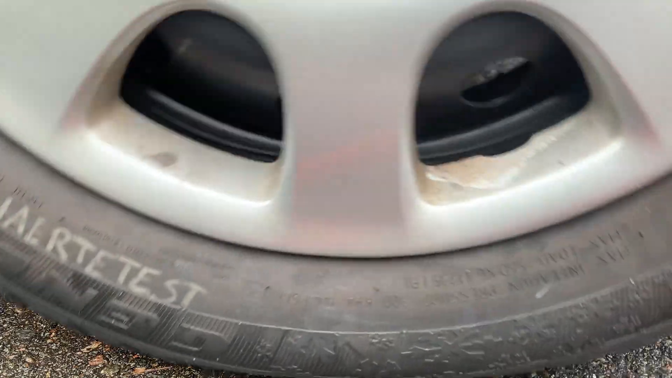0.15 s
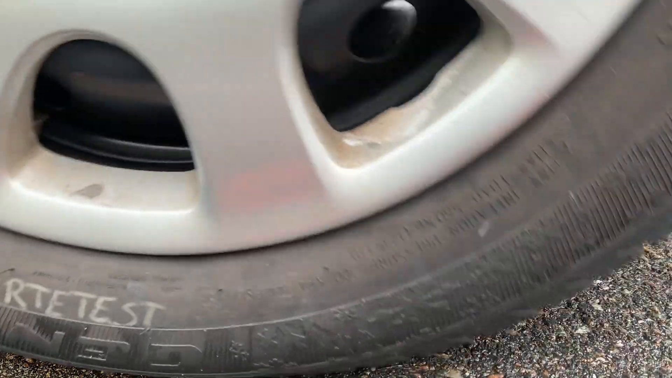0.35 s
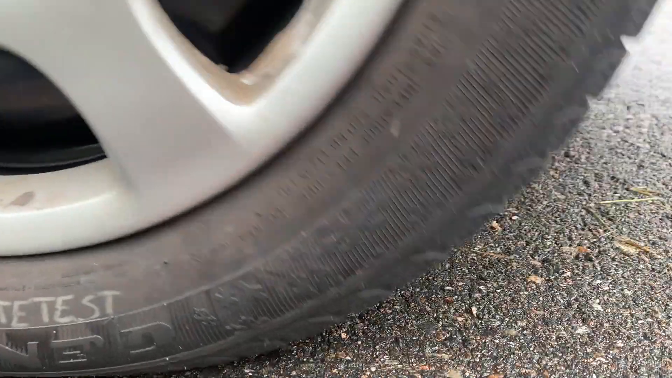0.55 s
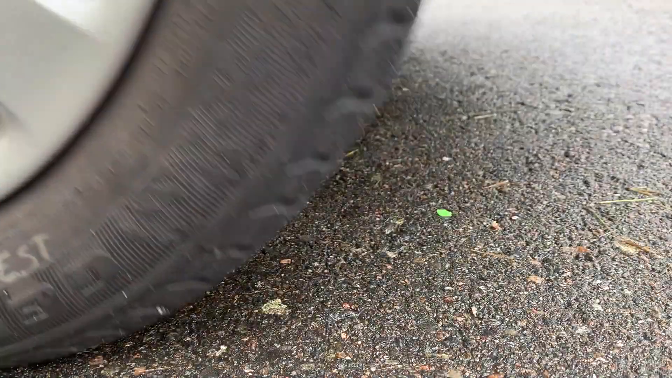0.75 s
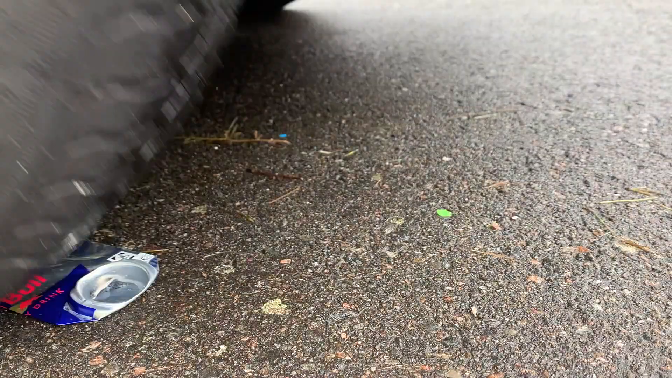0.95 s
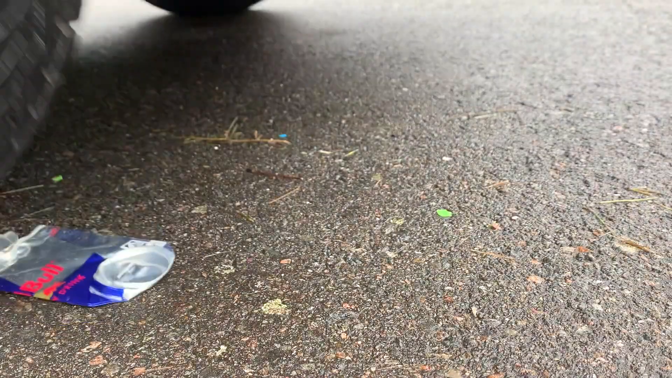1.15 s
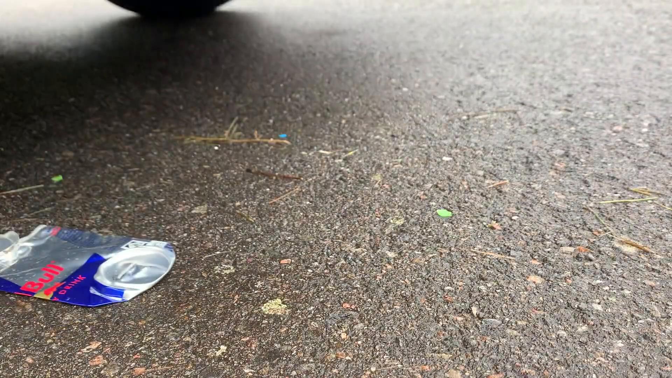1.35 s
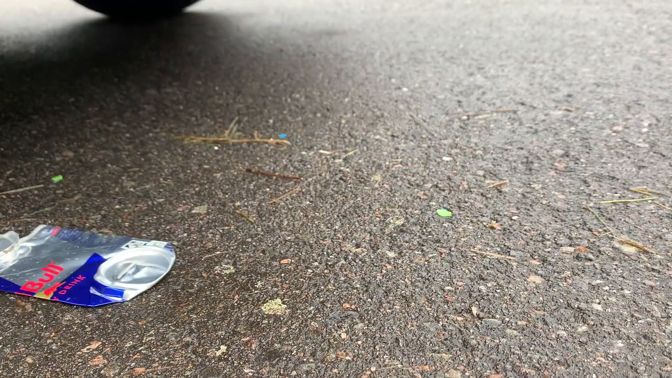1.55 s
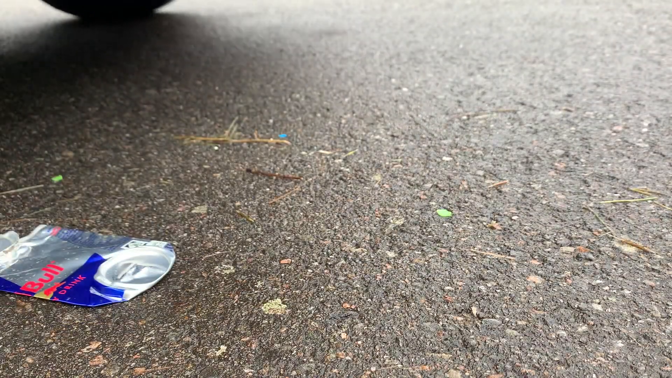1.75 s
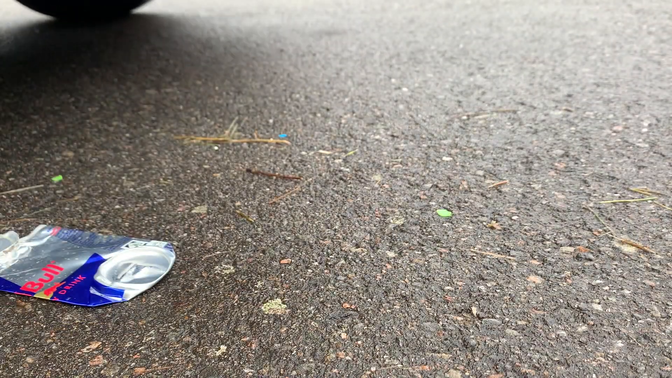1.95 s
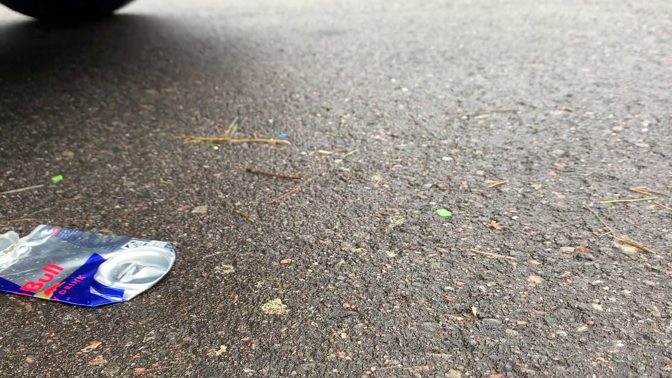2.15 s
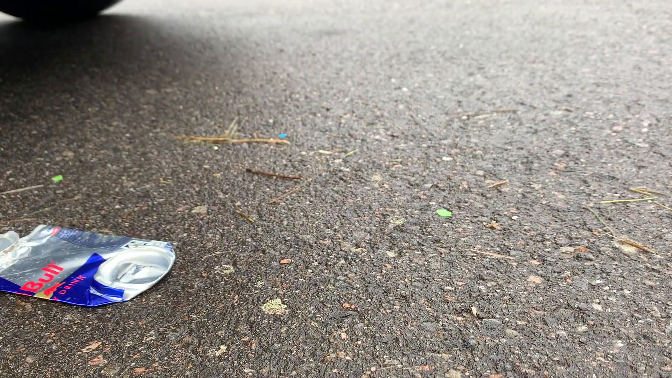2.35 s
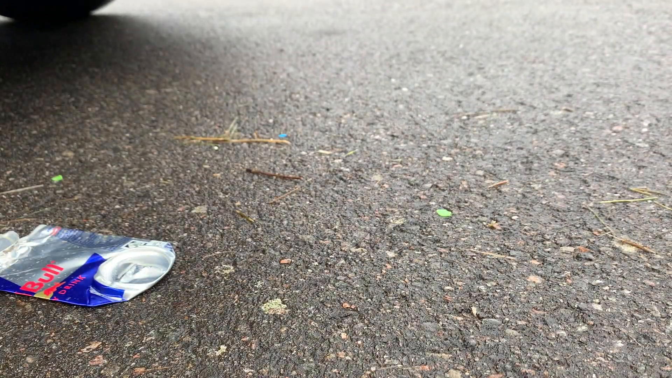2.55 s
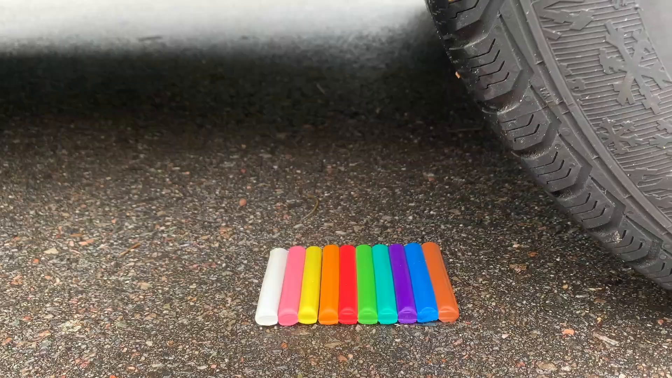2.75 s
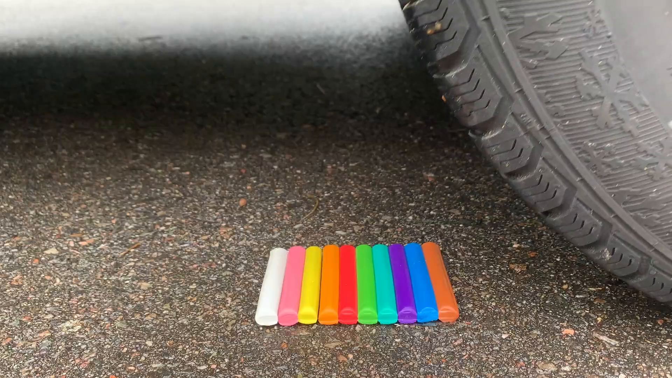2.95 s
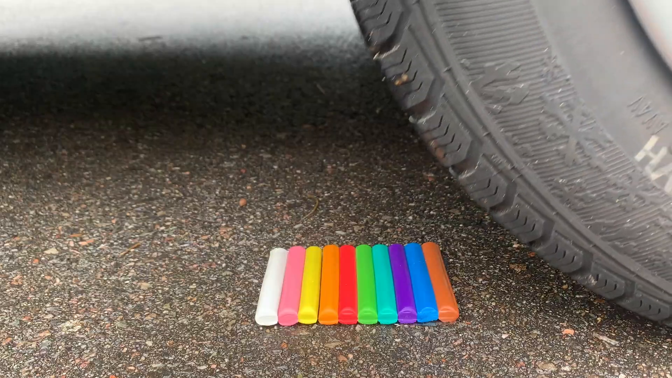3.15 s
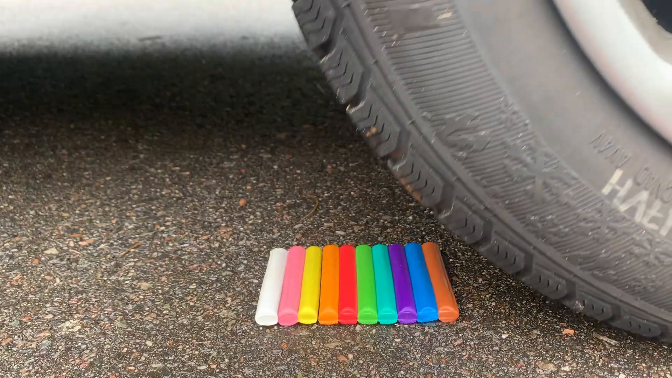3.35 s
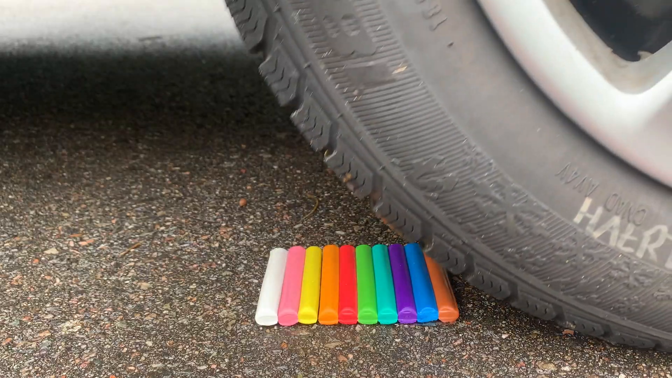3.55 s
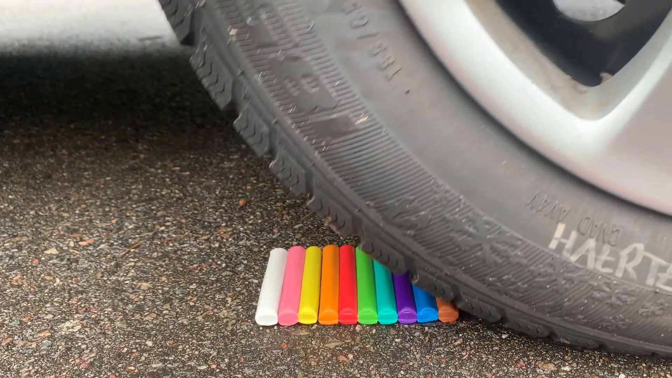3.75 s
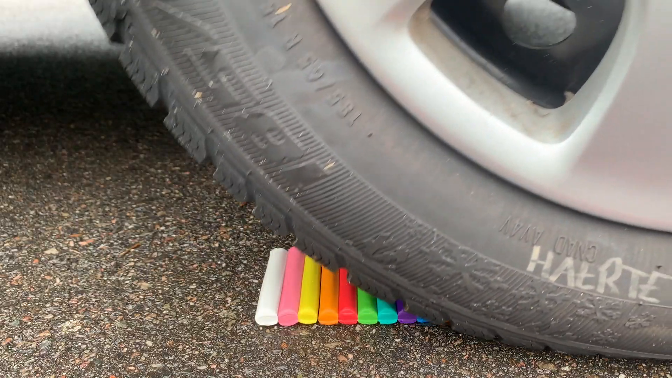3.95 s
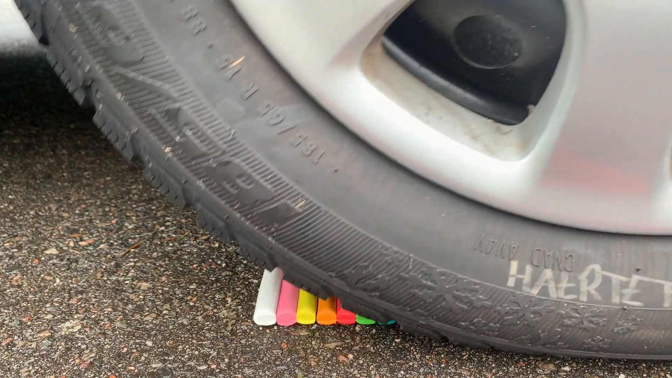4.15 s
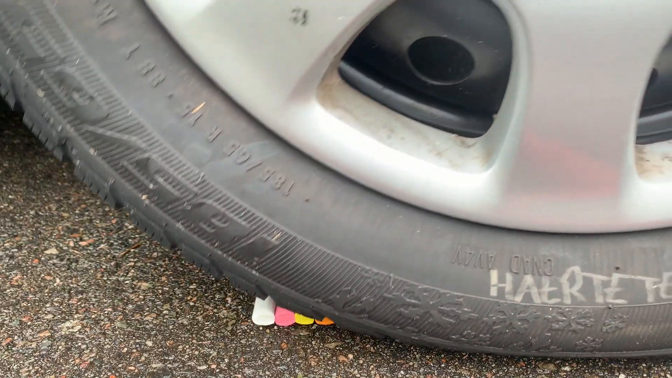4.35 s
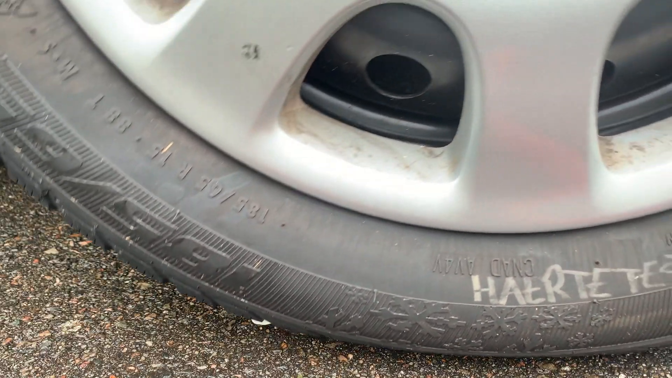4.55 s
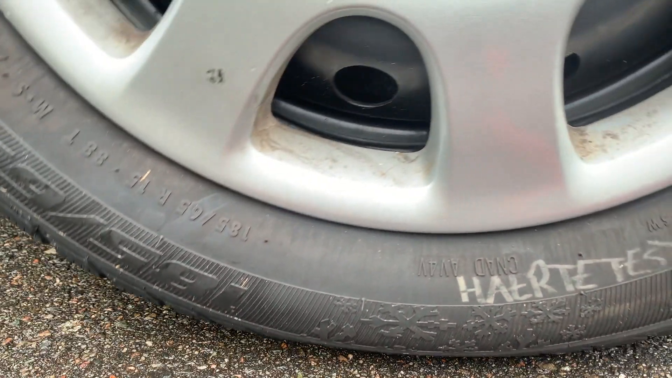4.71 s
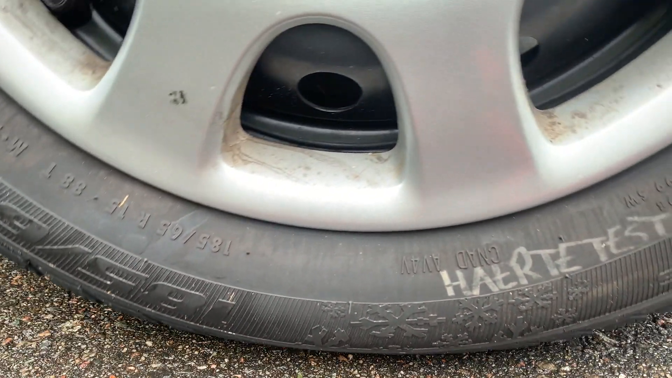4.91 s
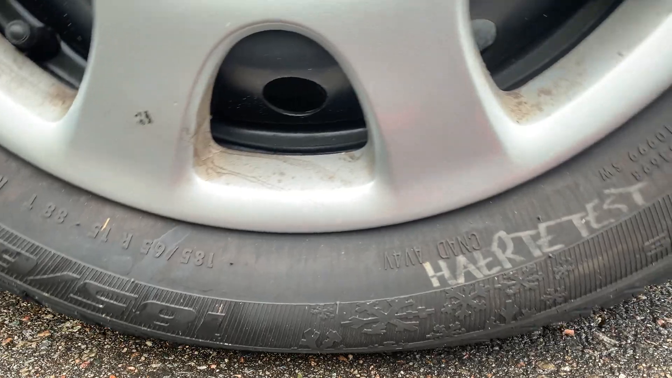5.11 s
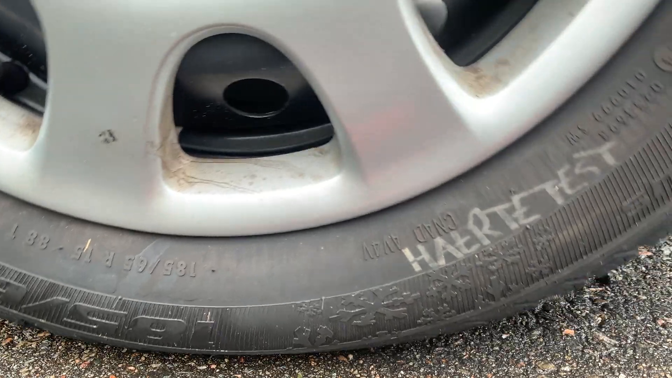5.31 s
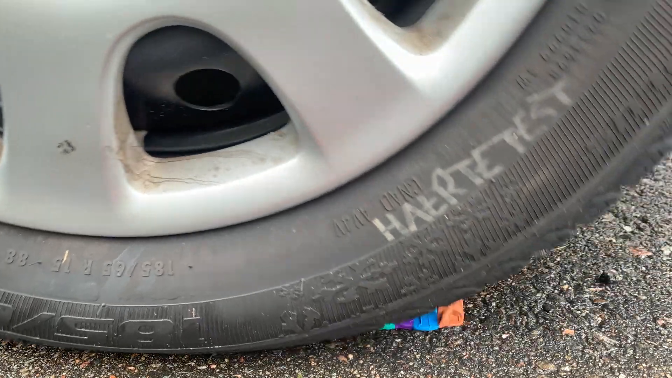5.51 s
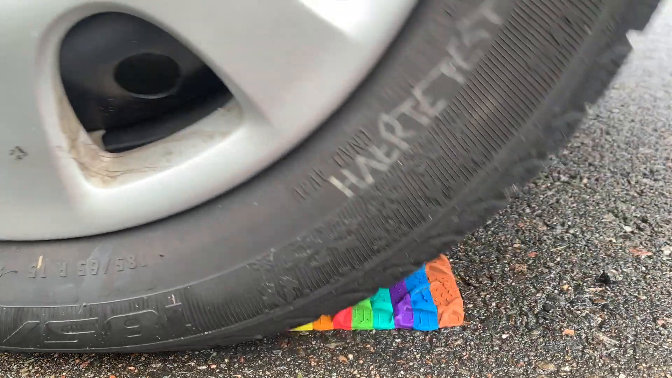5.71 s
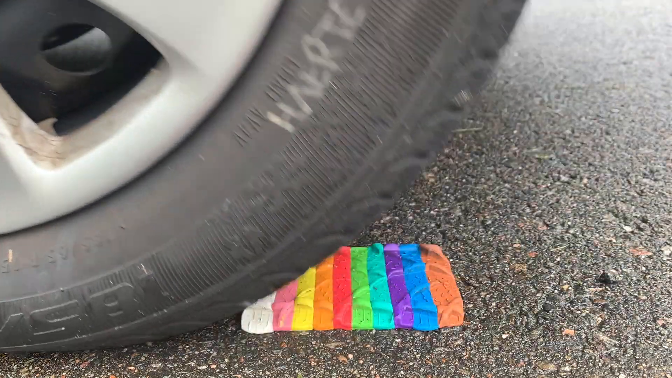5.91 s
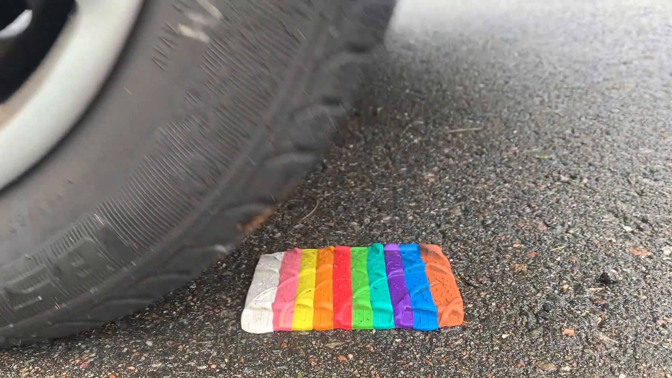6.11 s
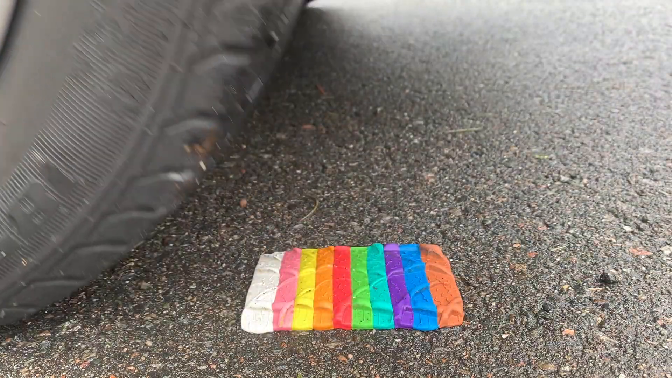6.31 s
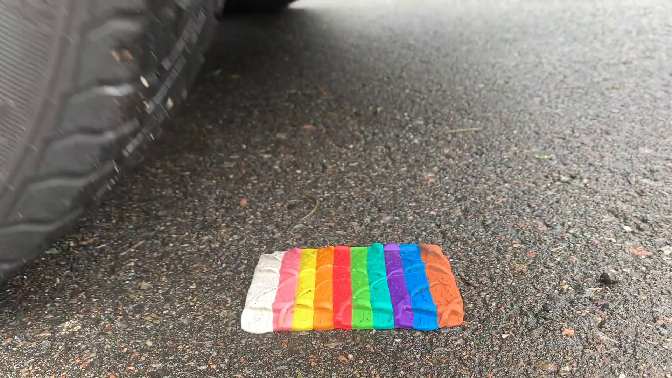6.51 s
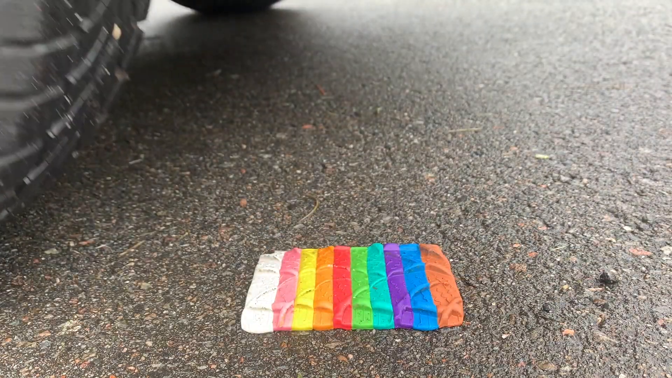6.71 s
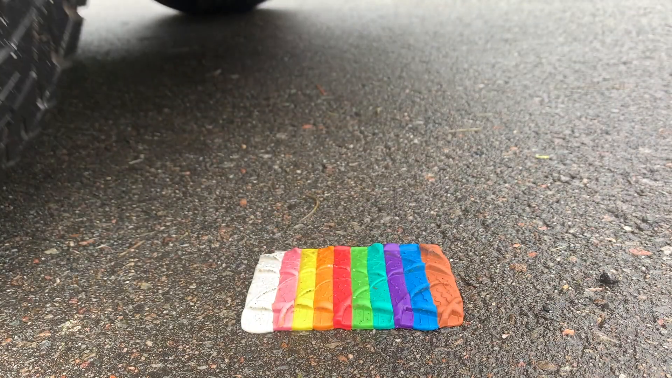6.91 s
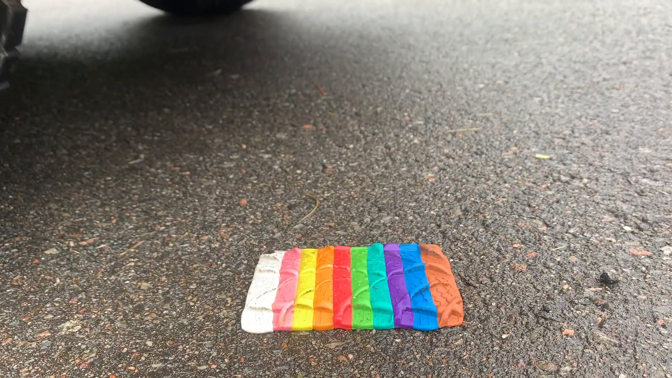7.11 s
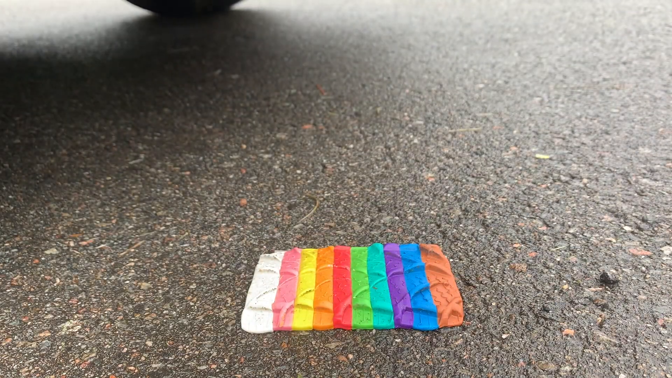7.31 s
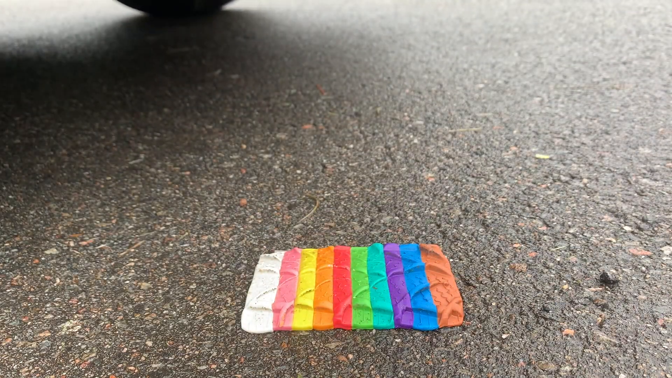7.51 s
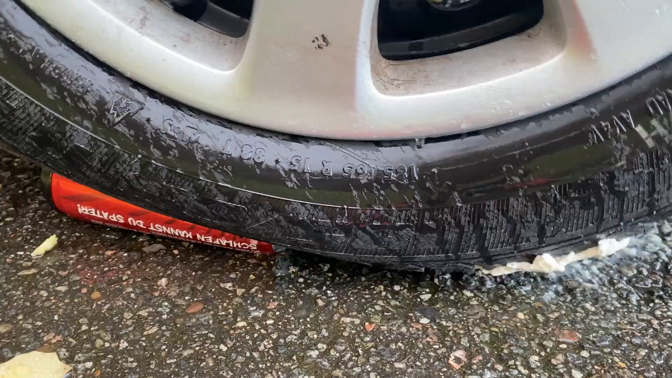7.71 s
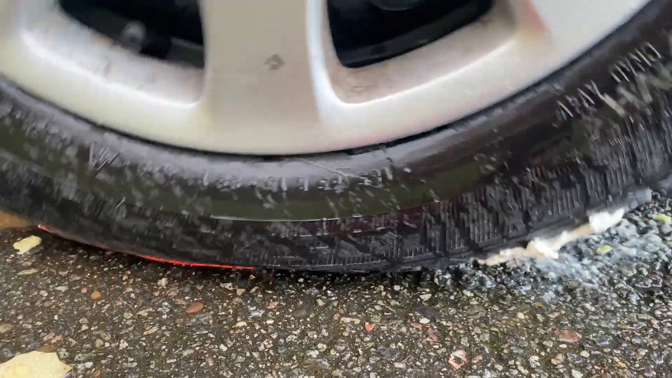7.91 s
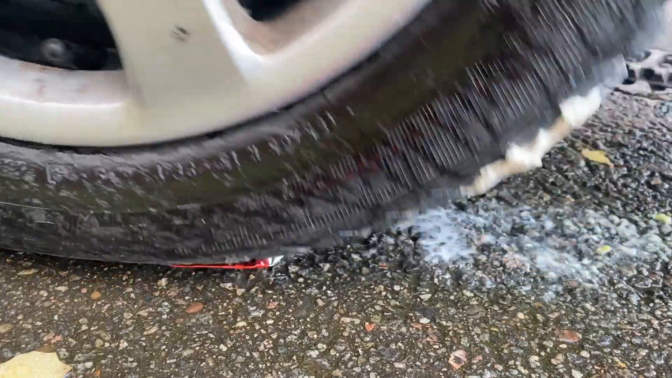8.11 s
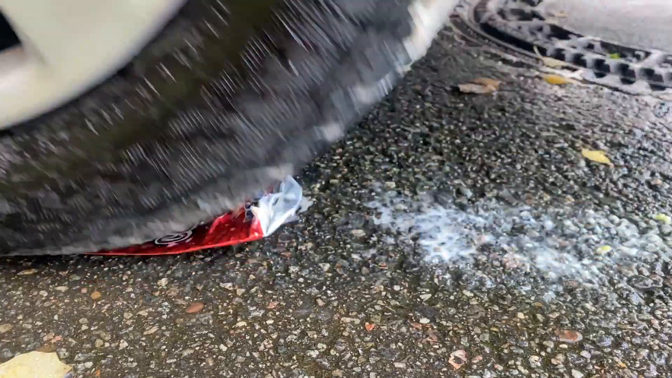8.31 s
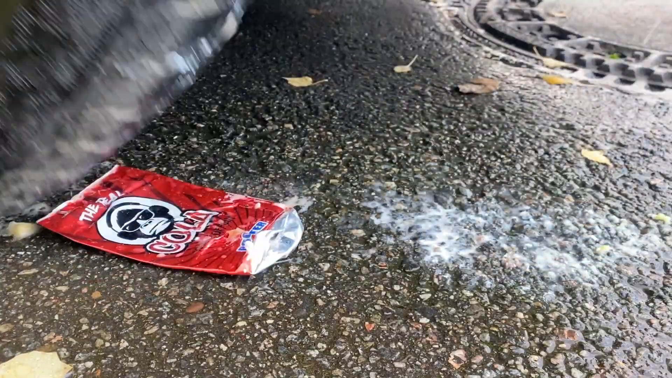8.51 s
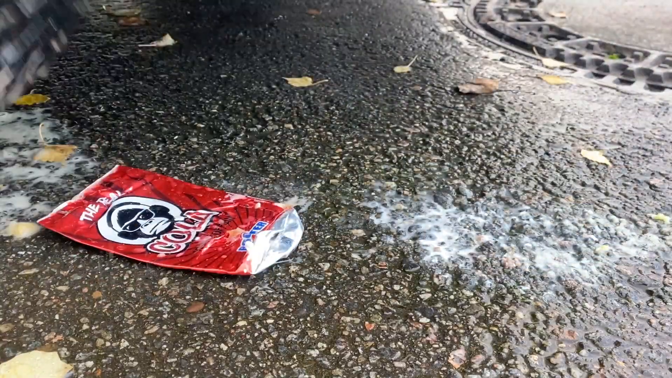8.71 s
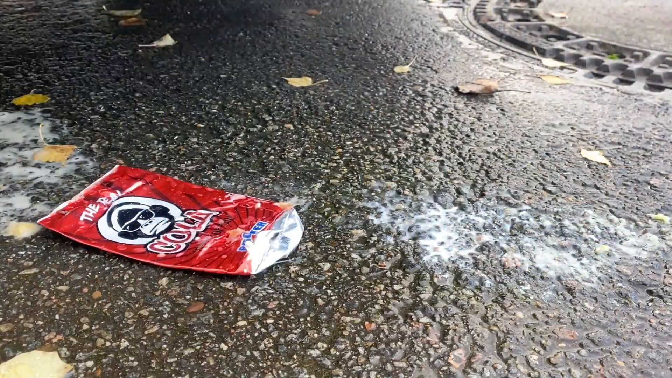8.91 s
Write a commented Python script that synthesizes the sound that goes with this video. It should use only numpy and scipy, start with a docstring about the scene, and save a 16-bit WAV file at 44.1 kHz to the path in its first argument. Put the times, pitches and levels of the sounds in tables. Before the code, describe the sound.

A slow car tyre crunches an aluminium can, rolls over soft clay, then bursts a full can with a bang over engine rumble.

```python
"""Cans and clay crushed under a slow car tyre on asphalt: three short passes, heard from the ground.
Pass 1: an aluminium can buckles; its folds ring, the sheet cracks, its side caves in with thumps.
Pass 2: soft clay sticks are rolled flat, with grit ticks and a fine creak.
Pass 3 cuts in with a click: a full can squeals gas, bursts and fizzes; the wet shell crackles.
Behind: the engine near idle (firings ring pipes and block), fan, belt and tyre hiss, a faint whine."""
import sys
import numpy as np
from scipy import signal
from scipy.fft import rfft, irfft, next_fast_len
from scipy.io import wavfile
from scipy.ndimage import uniform_filter1d

SR = 44100
rng = np.random.default_rng(int(sys.argv[2]) if len(sys.argv) > 2 else 0)


def master(y):
    """Save y as 16-bit WAV."""
    cut = np.clip(np.atleast_2d(y).T, -1, 1)
    pcm = np.round(cut * 32767)  # scale
    wavfile.write(sys.argv[1], SR, pcm.astype(np.int16))


N = 395136
T = np.arange(N) / SR
WET_S, BURST_S = 7.615, 7.779  # start of pass 3; seam failure

# fan, belts, tyre; per pass: t/s, level/dB
HISS_LEVEL = [
    [(0.0, -47), (0.6, -48.5), (1.6, -52.5), (2.68, -55.5)],
    [(2.69, -50), (4.0, -50.5), (7.61, -54.5)],
    [(7.62, -52), (8.15, -57.5), (8.5, -56), (8.96, -60)],
]
# hiss spectra: f/Hz, level/dB
HISS_DRY = [(70, -30.5), (120, -6.5), (200, -5), (231, -13.5), (540, -18), (721, -22), (1130, -27),
            (1490, -32.5), (3600, -41), (4550, -50.5), (5260, -57), (6190, -51), (7150, -64), (7750, -65.5),
            (8080, -43), (15000, -81.5)]
HISS_WET = [(60, -36.5), (120, -26.5), (200, -14), (258, -18.5), (314, -35), (530, -16), (1050, -26),
            (4720, -38), (8570, -42), (9720, -39), (12300, -59), (15000, -61)]
# whine swells: start/s, end/s, level/dB
WHINE_SPANS = [(1.114, 1.427, -70.5), (1.753, 2.562, -72), (4.078, 4.68, -80.5), (6.687, 7.08, -78)]

# engine speed; per pass: t/s, firing rate/Hz
FIRING_RATE = [
    [(0.0, 26.5), (0.19, 31.2), (0.4, 33.7), (0.68, 34.4), (0.83, 31.0), (1.58, 29.8), (1.92, 28.5),
     (2.68, 27.8)],
    [(2.69, 23.3), (3.11, 19.6), (3.27, 21.6), (3.52, 25.1), (3.8, 25.75), (4.13, 23.2), (4.28, 23.0),
     (4.72, 24.65), (5.01, 24.7), (5.87, 24.0), (6.32, 26.8), (6.72, 26.2), (6.93, 26.7), (7.61, 26.8)],
    [(7.62, 35), (7.9, 36.7), (8.17, 33.2), (8.28, 34.1), (8.38, 37), (8.5, 38.8), (8.88, 32), (8.96, 31.7)],
]
# firing strength per cylinder: level/dB
CYLINDER_DB = [2.83, 2.1, 3.96, 3.24]
# per pass: t/s, exhaust/dB, low pipe re exhaust/dB, tailpipe directivity/dB
EXHAUST_LEVEL = [
    [(0.0, -23.5, 0, 2.5), (0.19, -37, 6, -16.5), (0.4, -31, 6, -1.5), (0.66, -27, -6.5, -2),
     (0.89, -30.5, 3, -1.5), (1.5, -33, 6, -0.5), (2.68, -40, 4, 0)],
    [(2.69, -33.5, 2.5, -5), (3.05, -39.5, 8, -18), (3.45, -26, -4.5, -6.5), (4.1, -29.5, -2, -20.5),
     (5.0, -29, -3, -14.5), (5.88, -29, 0, -3.5), (6.31, -25.5, -4.5, 1), (7.61, -28.5, -3.5, 4)],
    [(7.62, -37.5, -2.5, 0), (7.77, -38, 2, -8.5), (7.9, -68.5, 8, -8.5), (8.19, -45.5, 6.5, 1),
     (8.36, -35, -3.5, -5), (8.58, -38.5, -4.5, -3.5), (8.96, -46.5, -1.5, 1.5)],
]
# row per pass: throb/dB, upper pipe/dB, block/dB, gas in upper pipe/1, gas in low pipe/1, puff/dB
ENGINE_MIX = [(-31, -8, 10, 1, 0.56, -39.5), (-41, -8, 5.5, 0.38, 0.41, -49), (-49, -5.5, -7, 0.7, 1, -55)]
# exhaust resonances: f/Hz, width/Hz, level/dB
BOOM_MODES = [(132.6, 16.7, 0), (164.2, 13.4, 0)]
LOW_PIPE_MODES = [(58.15, 8.5, -2.5), (79.4, 14.6, 2), (95.7, 21.5, -2.5)]
UPPER_PIPE_MODES = [(263.2, 27, 14.3), (322.6, 14, 5), (378.6, 10.8, 4.1)]
# upper mode re lower: t/s, level/dB
BOOM_TILT = [(0, -1.5), (.75, -2.5), (1.0, 3), (1.6, 1.5), (2.68, -9.5), (2.69, 3.5), (3.6, -5.5),
             (4.1, 3.5), (5.9, 1.5), (6.2, -4), (8.96, -4.5)]
BLOCK_TILT = [(0, 3.5), (1.8, 5.5), (2.3, -6.5), (2.68, -8.5), (2.69, 5), (4.2, 8.5), (5.0, 0.5), (6.2, 1),
              (6.8, -7.5), (8.96, -6.5)]
# upper pipe rung on every second firing: t/s, level/dB
ALTERNATE_RING_LEVEL = [(4.6, -73), (5.2, -47), (5.8, -44), (6.3, -56), (6.6, -81.5)]
# lower and upper block mode: width/Hz, level/dB
BLOCK_MODES = [(30.6, 1.5), (29.5, 0.5)]
# block mode glide; per pass: t/s, lower f/Hz, upper f/Hz
BLOCK_GLIDE = [
    [(0, 556, 601), (1.2, 539, 617), (2.68, 538, 601)],
    [(2.69, 467, 554), (3.3, 435, 565), (3.8, 463, 601), (4.5, 529, 620), (5.0, 547, 607), (6.2, 525, 622),
     (7.61, 540, 647)],
    [(7.62, 527, 620), (8.96, 499, 618)],
]
# valve gear and covers: f/Hz, width/Hz, level/dB
CLATTER_MODES = [(824, 90, -6.5), (1132.5, 34, -9), (1286, 37, -13.5), (1610, 210, -11.5), (1786, 39, -9.5),
                 (2115, 30, -14), (2393, 61, -15.5), (3540, 260, -30)]
# tappet: t/s, level/dB
TAPPET_KNOCKS = [(2.7522, -41), (2.94, -51), (3.134, -42.5), (3.319, -52), (3.489, -44.5), (3.649, -46.5),
                 (3.8056, -40.5), (3.9686, -44), (4.14, -47), (4.323, -44.5), (4.484, -42), (4.6527, -48),
                 (4.9774, -42)]

# dry grit: t/s, level/dB, f/Hz, treble/dB
GRIT_TICKS = [(1.4392, -35.5, 2350, -50), (3.0595, -31, 2580, -37.5), (3.9572, -45, 2040, -41.5),
              (4.0454, -52, 2010, -41.5), (4.1621, -38, 2200, -53), (4.325, -42, 3500, -44),
              (4.372, -55, 3000, -52), (4.5469, -33.5, 2630, -40), (4.6176, -38, 2350, -47),
              (4.7011, -56, 2140, -40.5), (4.9652, -40.5, 2560, -36), (5.0493, -40.5, 2056, -65),
              (5.1153, -43, 2816, -45), (5.5697, -58, 2010, -46), (5.6161, -39, 2472, -54),
              (7.3076, -34.5, 2130, -72)]
# row 1 click at the hard cut into pass 3, later rows wet shell: t/s, level/dB, f/Hz, treble/dB
WET_PASS_CLICKS = [(7.615, -29.5, 1304, -39), (7.7082, -36.5, 3130, -28), (7.8744, -39.5, 2500, -41),
                   (7.8975, -39.5, 1640, -40), (7.9436, -38.5, 4000, -33.5), (8.01, -25.5, 2320, -27.5),
                   (8.083, -26.5, 4570, -26.5), (8.0914, -31, 1910, -57), (8.1004, -29.5, 1229, -43),
                   (8.116, -22.5, 1010, -49), (8.1433, -34, 1144, -46), (8.1784, -29, 2100, -41),
                   (8.2275, -32.5, 3500, -26.5), (8.2452, -28, 1880, -57), (8.2586, -30, 3700, -36),
                   (8.3005, -29, 3120, -37), (8.3175, -37, 4028, -35), (8.3455, -39, 4800, -34.5),
                   (8.4004, -27, 3630, -26.5), (8.5088, -37.5, 4120, -36), (8.521, -32, 4470, -45),
                   (8.7229, -39.5, 4030, -64)]
# gas jet at the seam: f/Hz, level/dB
SQUEAL_PARTIALS = [(1195, 3), (1900, -14), (2400, -21.5), (3580, -19.5), (5470, -32)]
# pressure swing: delay/s, f/Hz (negative: suction first), t60/s, level/dB
BURST_MODES = [(0.001198, 843, 0.0065, -1.5), (.003, 230, 0.012, -10), (.0048, -115, .022, -8.5),
               (0.0088, 26, .06, -15)]
# tyre kneading the can: t/s, hold/s, level/dB
KNEAD_BOUTS = [(0, 0.0019, -31.5), (0.043, 0.061, -46), (0.187, 0.034, -37.5), (0.26, 0.051, -35),
               (0.335, 0.13, -33.5), (0.491, 0.036, -40), (0.553, 0.083, -50), (0.713, 0.065, -42.5),
               (0.807, 0.033, -53), (0.901, 0.035, -50)]
# can side caving in: t/s, level/dB, f/Hz
CAVE_INS = [(0.063, -1, 251), (0.074, -8.5, 237), (0.246, -22, 181), (0.287, -15.5, 235),
            (0.338, -11.5, 205.6), (0.346, -10.5, 386), (0.359, -11.5, 104.6), (0.367, -5, 246),
            (0.926, -23.5, 399)]
# can wall: t/s, level/dB, fold f/Hz, crack/dB, t60/s
WALL_BUCKLES = [(0.004, -12.5, 967, -42, 0.16), (0.022, -16, 966, -46, 0.062),
                (0.062, -3.5, 1207, -23.5, 0.059), (0.072, -2.5, 870, -20, 0.02),
                (0.104, -14, 1024, -37.5, 0.041), (0.171, -31, 1080, -25.5, 0.025),
                (0.188, -42, 1140, -26.5, 0.025), (0.197, -27.5, 1100, -19, 0.032),
                (0.21, -11, 1080, -19, 0.022), (0.246, -19.5, 1220, -33, 0.02),
                (0.264, -8.5, 1350, -17.5, 0.027), (0.285, -9, 1250, -28.5, 0.077),
                (0.299, -4.5, 1305, -21.5, 0.029), (0.325, -24.5, 1420, -32.5, 0.06),
                (0.336, -5.5, 1170, -14.5, 0.024), (0.346, -4, 1230, -22.5, 0.029),
                (0.3555, -0.5, 1160, -33, 0.018), (0.368, -9, 1190, -19.5, 0.038),
                (0.381, -8.5, 1290, -40, 0.067), (0.404, -5, 1350, -22.5, 0.015),
                (0.407, -15, 2385, -65, 0.085), (0.427, -9.5, 2350, -62, 0.084),
                (0.425, -7, 1230, -21.5, 0.034), (0.44, -16.5, 1230, -20, 0.067),
                (0.457, -17, 1156, -38, 0.028), (0.496, -5.5, 1797, -60, 0.12),
                (0.493, -8.5, 1260, -17.5, 0.028), (0.517, -16, 1280, -19, 0.073),
                (0.527, -7, 1724, -26, 0.071), (0.549, -19.5, 1850, -33.5, 0.05),
                (0.56, -12, 1790, -28.5, 0.0066), (0.59, -25.5, 1340, -36, 0.032),
                (0.623, -17, 1120, -34, 0.017), (0.7109, -33, 3060, -43.5, 0.02),
                (0.727, -18.5, 1190, -43, 0.032), (0.747, -31.5, 1030, -30.5, 0.066),
                (0.769, -8.5, 1675, -34, 0.022), (0.791, -27, 1290, -45, 0.045),
                (0.815, -21, 930, -21.5, 0.022), (0.831, -14.5, 1370, -44, 0.027),
                (0.831, -15, 1800, -60, 0.086), (0.926, -12.5, 1305, -19, 0.025),
                (0.931, -15.5, 1115, -28, 0.038), (1.063, -12, 1677, -23, 0.042),
                (1.11, -18.5, 1650, -31.5, 0.045), (1.152, -30.5, 1650, -46, 0.04)]
# modes rung by cracks (thin sheet; the 8400 Hz row is the microphone): f/Hz, t60/s, level/dB
RUNG_MODES = [(1260, 0.03, -5), (1820, 0.03, -7), (2330, 0.018, -4), (2900, 0.01, -6), (3945, 0.005, -3),
              (4500, 0.0025, 1), (6050, 0.001, 7), (8400, 0.006, -5), (9800, 0.0017, -0.5)]
# microphone ring near 8 kHz with a dip just below, colouring the cracks: f/Hz, level/dB
MIC_RING_EQ = [(6300, 0.5), (7400, -5.5), (8050, 2), (9500, -0.5), (12500, -2.5)]

# left re right: f/Hz, level/dB, phase lead/rad
STEREO_DRY = [(40, 1, -.4), (150, 0, -.45), (500, 1, .1), (1200, 0, 1.2), (2000, -2, 3.2), (4000, -1, 6),
              (6000, -1, 12.3), (8200, -12, 18.4), (10000, -5, 19.5), (13000, 0, 19)]
STEREO_WET = [(40, 1, .1), (250, 0, .2), (600, 3, 1), (1500, 5, .6), (2500, 4, 2.8), (4000, 6, 6),
              (6000, 3, 8), (8200, 0, 9.6), (10000, -1, 12.6)]
# microphone treble response: f/Hz, level/dB
MIC_EQ = [(9000, 0), (11000, 2.5), (12000, -4), (13500, -3.5), (15500, -22)]


def undb(db):
    """dB to amplitude."""
    return 10 ** (np.asarray(db) / 20)


def unit(x):
    """Scale to rms 1."""
    return x / np.sqrt(np.mean(x ** 2))


def curves(*tables):
    """Join (t/s, value, ..) tables; interpolate each value column per sample."""
    t_s, *columns = np.transpose(np.concatenate(tables))
    return [np.interp(T, t_s, column) for column in columns]


def add(out, t_s, x):
    """Mix x in at t_s."""
    i = int(t_s * SR)
    out[:, i:i + x.shape[-1]] += x[..., :N - i]


def noise(count, correlation):
    """Stereo white noise, partly common to both sides."""
    common, own = rng.standard_normal(count), rng.standard_normal((2, count))
    return np.sqrt(correlation) * common + np.sqrt(1 - correlation) * own


def walk(rate_hz):
    """Slewed random steps, spread near 1."""
    hold = int(SR / rate_hz)
    return 1.304 * uniform_filter1d(np.repeat(rng.standard_normal(N // hold + 1), hold), hold)[:N]


def pops(rate_hz, spread_db, cap, correlation):
    """Random stereo impulses; exponential dB spread, limited to cap * spread_db."""
    hits = rng.random(N) < rate_hz / SR
    return hits * undb(spread_db * np.minimum(rng.exponential(size=N), cap)) * noise(N, correlation)


def equalise(x, points):
    """Zero-phase filter through (f/Hz, level/dB) points."""
    hz, db = np.transpose(points)
    size = next_fast_len(N + 4096)
    bins_hz = np.fft.rfftfreq(size, 1 / SR) + 1
    gain = undb(np.interp(np.log(bins_hz), np.log(hz), db))
    return irfft(rfft(x, size) * gain, size)[..., :N]


def ring(x, hz, t60_s):
    """One decaying mode driven by x."""
    pole = np.exp(2j * np.pi * hz / SR - np.log(1000) / (t60_s * SR))
    return signal.lfilter([1], [1, -pole], x).imag


def resonate(x, modes):
    """Sum of (f/Hz, width/Hz, level/dB) resonances, rms 1; a wider second stage steepens the skirts."""
    out = 0
    for hz, width_hz, db in modes:
        narrow = signal.iirpeak(hz, hz / width_hz, SR)
        wide = signal.iirpeak(hz, hz / (3.5 * width_hz), SR)
        out = out + undb(db) * unit(signal.lfilter(*wide, signal.lfilter(*narrow, x)))
    return unit(out)


def glide(x, hz, width_hz):
    """Moving resonance: shift down, smooth twice, shift back; rms 1."""
    carrier = np.exp(2j * np.pi * np.cumsum(hz) / SR)
    narrow, wide = np.exp(-np.pi * width_hz / SR), np.exp(-3 * np.pi * width_hz / SR)
    baseband = signal.lfilter([1], np.convolve([1, -narrow], [1, -wide]), x / carrier)
    return unit((baseband * carrier).real)


def snap(hz, width_hz, t60_s, tail=0.2, attack_s=0.00045):
    """Band-noise burst with a faint tail, peak 1."""
    t = np.arange(int(.12 * SR)) / SR
    band = signal.iirpeak(hz, hz / width_hz, SR)
    envelope = np.minimum(t / attack_s, 1) * (1000. ** (-t / t60_s) + tail * 1000. ** (-t / .05))
    x = signal.lfilter(*band, signal.lfilter(*band, noise(len(t), 0.7) * envelope))
    return x / np.abs(x).max()


def struck(hz, t60_s):
    """Mode struck once: a damped sine."""
    t = np.arange(int(.12 * SR)) / SR
    return np.sin(2 * np.pi * hz * t) * 1000. ** (-t / t60_s)


def whine(hz=6000, drift_hz=9, fade_s=.1, rest_db=-86, overtone_db=-92):
    """Faint drifting tone that comes and goes, with its octave; dry passes only."""
    phase_rad = 2 * np.pi * np.cumsum(hz + drift_hz * walk(3)) / SR + 0.9 * walk(60)
    swells = sum(undb(db) * np.clip(np.minimum(T - start_s, end_s - T) / fade_s + .5, 0, 1)
                 for start_s, end_s, db in WHINE_SPANS)
    overtone = undb(overtone_db + 5 * walk(2)) * np.sin(2 * phase_rad)
    tone = (undb(rest_db) + swells) * undb(2 * walk(18)) * np.sin(phase_rad)
    return np.sqrt(2) * (tone + overtone) * (T < WET_S)


def hiss():
    """Fan, belt and tyre noise, grained by the rolling tread; dry ground, then wet."""
    reference_band = [(780, -60), (800, 0), (4000, 0), (4100, -60)]
    grounds = []
    for spectrum in (HISS_DRY, HISS_WET):
        grain = noise(N, 0.6) * undb(1.3 * walk(20) + 1.2 * walk(300))
        shaped = equalise(grain, spectrum)
        grounds.append(shaped / np.std(equalise(shaped, reference_band)))
    return np.where(T < WET_S, *grounds) * undb(curves(*HISS_LEVEL)[0] - 2.0)


def firings(jitter=0.0031, scatter_db=1.0):
    """Four unequal cylinders, slightly unsteady: running firing count and pulse train."""
    count = np.cumsum(curves(*FIRING_RATE)[0] * (1 + jitter * walk(25))) / SR
    fired = np.flatnonzero(np.diff(np.floor(count)))
    uneven_db = scatter_db * rng.standard_normal(N // 500)[:len(fired)]
    pulses = np.zeros(N)
    pulses[fired] = undb(np.resize(CYLINDER_DB, len(fired)) + uneven_db)
    return count, unit(pulses)


def tailpipe_puff(pulses, scatter_db=5.5, top_hz=450):
    """Bare, uneven pop of each firing at the tailpipe."""
    uneven = pulses * undb(scatter_db * rng.standard_normal(N))
    soft = signal.sosfilt(signal.butter(4, top_hz, fs=SR, output="sos"), uneven)
    return resonate(soft, [(198, 183, 0)])


def exhaust_boom(drive):
    """Two exhaust modes in antiphase, so the band between them stays full."""
    upper_gain = undb(curves(BOOM_TILT)[0])
    lower, upper = resonate(drive, BOOM_MODES[:1]), resonate(drive, BOOM_MODES[1:])
    return (lower - upper_gain * upper) / np.hypot(1, upper_gain)


def engine_block(drive):
    """Two block modes that glide as the car rolls by."""
    tilt_db = curves(BLOCK_TILT)[0] / 2
    return sum(undb(sign * tilt_db + db - 3.5) * glide(drive, hz, width_hz)
               for sign, hz, (width_hz, db) in zip((-1, 1), curves(*BLOCK_GLIDE), BLOCK_MODES))


def valve_clatter(gas):
    """Pulsing noise rings valve gear and covers, each mode flickering; dry passes only."""
    return (T < WET_S) * sum(undb(db + 2.0 * walk(17)) * resonate(gas, [(hz, width_hz, 0)])
                             for hz, width_hz, db in CLATTER_MODES)


def engine():
    """Firing pulses ring pipes and block, the upper pipe also on every second firing; gas noise pulses in step."""
    exhaust_db, low_db, tailpipe_db = curves(*EXHAUST_LEVEL)
    hiss_db = curves(*HISS_LEVEL)[0]
    pass_index = np.searchsorted([rows[0][0] for rows in EXHAUST_LEVEL[1:]], T)
    throb_db, upper_db, block_db, upper_gas, low_gas, puff_db = np.array(ENGINE_MIX)[pass_index].T
    count, pulses = firings()
    puff = undb(puff_db + tailpipe_db) * tailpipe_puff(pulses)
    gas = unit(noise(N, 0.81) * (1.4 + np.exp(-(count % 1) / 0.073)))
    clatter = undb(hiss_db + 2 + 0.25 * tailpipe_db) * valve_clatter(gas)
    block = undb(hiss_db + block_db) * engine_block(0.3 * pulses + gas)
    throb = undb(throb_db + 1.4 * tailpipe_db + 1.2 * walk(9)) * np.sqrt(2) * np.sin(2 * np.pi * count)
    alternate_pulses = pulses * (count % 2 < 1)
    alternate_ring = undb(curves(ALTERNATE_RING_LEVEL)[0]) * resonate(alternate_pulses, [(275, 13, 0)])
    rumble = undb(-14.5) * resonate(gas, [(40, 40, 0)])
    low_pipe = undb(low_db) * resonate(pulses + low_gas * gas, LOW_PIPE_MODES)
    upper_pipe = undb(upper_db + 0.99 * tailpipe_db) * resonate(pulses + upper_gas * gas, UPPER_PIPE_MODES)
    exhaust = undb(exhaust_db) * (exhaust_boom(pulses + .05 * gas) + rumble + low_pipe + upper_pipe)
    return throb + exhaust - puff + alternate_ring + block + clatter


def tappet():
    """Soft knock about once per engine cycle in pass 2: bright edge, then a lower ring."""
    out = np.zeros((2, N))
    for t_s, db in TAPPET_KNOCKS:
        add(out, t_s, undb(db) * snap(2540, 740, 0.067))
        add(out, t_s + 0.0065, undb(db + 4) * snap(1880, 400, 0.09))
    return out


def ticks(events, t60_s, edge_hz, click_db):
    """Small ticks: short noisy ring, bright edge, sharp click."""
    out = np.zeros((2, N))
    for t_s, db, hz, treble_db in events:
        body = undb(db - 3) * snap(hz, .4 * hz, t60_s)
        edge = undb(treble_db) * snap(edge_hz, 3100, 0.0054)
        click = undb(db + click_db) * (snap(2800, 3900, .004, attack_s=.0001) + struck(hz, .003))
        add(out, t_s, body + edge + click)
    return out


def grit_and_clay(creak_s=4.1915, gap_s=.0096):
    """Grit ticks under the tread; the clay creaks once, in four quick ticks."""
    creak = [(creak_s + k * gap_s, -37, 2800, -70) for k in range(4)]
    return ticks(GRIT_TICKS + creak, t60_s=0.0048, edge_hz=8340, click_db=-11.5)


def wet_pass_clicks():
    """Broadband click at the hard cut into pass 3; then the wet shell crackles."""
    return ticks(WET_PASS_CLICKS, t60_s=0.013, edge_hz=7940, click_db=-1)


def fizz(peak_s=8.12, end_s=8.75, peak_db=-55.5, rise_db_per_s=38, fall_db_per_s=54):
    """Foam and grit pop under the wet tread after the burst, swelling and dying away."""
    foam = pops(rate_hz=1500, spread_db=3, cap=4, correlation=.6)
    db = peak_db - np.maximum(rise_db_per_s * (peak_s - T), fall_db_per_s * (T - peak_s))
    return resonate(foam, [(2480, 4200, 0), (1000, 1100, -7)]) * undb(db) * (T > BURST_S) * (T < end_s)


def squeal(start_s=7.7595, jump_s=7.7692, ramp_s=.001):
    """Gas through the splitting seam: swells to half, jumps to full, stops at the burst."""
    swell = np.interp(T, [start_s, jump_s, jump_s + ramp_s, BURST_S, BURST_S + ramp_s], [0, .5, 1, 1, 0])
    lowest_hz = SQUEAL_PARTIALS[0][0]
    tones = sum(undb(db) * swell ** (hz / lowest_hz) * np.sin(2 * np.pi * hz * (T - 7.77))
                for hz, db in SQUEAL_PARTIALS)  # higher partials join later
    return undb([[-29.5], [-5.5]]) * tones  # left, right


def burst(left_bias_db=5):
    """The seam lets go: pressure swing, crack, pop and spray."""
    out = np.zeros((2, N))
    pan_db = left_bias_db * np.array([[.5], [-.5]])
    for delay_s, hz, t60_s, db in BURST_MODES:
        add(out, BURST_S + delay_s, undb(db + pan_db) * struck(hz, t60_s))
    crack = undb(-16.5) * snap(4500, 9300, 0.011, tail=0.16)
    pop = undb(-12.5) * snap(770, 1400, 0.037, tail=0.39)
    spray = undb(-23) * snap(900, 1500, 0.13, attack_s=.004)
    add(out, BURST_S, crack + pop + spray)
    return out


def creases(attack_s=0.011, t60_s=0.13):
    """The tyre kneads the can in bouts; each small crease tears for a moment."""
    onsets = pops(rate_hz=550, spread_db=3.5, cap=3, correlation=.7)
    tearing = signal.lfilter([1], [1, -.985], np.abs(onsets)) * noise(N, .7)
    envelope = 0
    for t_s, hold_s, db in KNEAD_BOUTS:
        rise = np.clip((T - t_s) / attack_s + 1, 0, 1)
        envelope += rise * undb(db - 60 * np.maximum(T - t_s - hold_s, 0) / t60_s)
    return unit(tearing) * envelope


def can_crush(panel_hz=3800, panel_spread=0.055, body_hz=623):
    """Each buckle rings its fold, a flat panel and the whole can, and cracks the sheet; cave-ins thump."""
    out, cracks = np.zeros((2, 2, N))
    pings_hz = panel_hz * (1 + panel_spread * rng.standard_normal(len(WALL_BUCKLES)))
    for (t_s, db, fold_hz, crack_db, t60_s), ping_hz in zip(WALL_BUCKLES, pings_hz):
        fold = 0.45 * struck(fold_hz, t60_s) + 0.35 * struck(fold_hz, 0.0073)
        fold_noise = 0.5 * snap(fold_hz, 900, 0.83 * t60_s)
        add(cracks, t_s, undb(crack_db + 6) * snap(11000, 15600, 0.0014, tail=0.12, attack_s=0.00032))
        ping = undb(crack_db - 7) * struck(ping_hz, 0.017)
        spike = undb(crack_db - 4.5) * struck(ping_hz, .0015)
        body = undb(db - 15.5) * snap(body_hz, 650, 0.023)
        add(out, t_s, undb(db + 1) * (fold + fold_noise) + ping + spike + body)
    for t_s, db, hz in CAVE_INS:
        add(out, t_s, undb(db) * (struck(hz, 0.042) + 0.8 * snap(257, 900, 0.078)))
    cracks += creases()
    ringing = sum(undb(db) * ring(cracks, hz, t60_s) for hz, t60_s, db in RUNG_MODES)
    return out + equalise(0.97 * cracks + 0.16 * ringing, MIC_RING_EQ)


def scene():
    """All three passes, stereo."""
    return (engine() + tappet() + can_crush() + grit_and_clay() + wet_pass_clicks()
            + squeal() + burst() + fizz() + hiss() + whine())


def stereo_split(x, points):
    """Level and phase offset, half to each side."""
    hz, db, lead_rad = np.transpose(points)
    size = next_fast_len(N + 4096)
    bins_hz = np.fft.rfftfreq(size, 1 / SR)
    half = undb(np.interp(bins_hz, hz, db) / 2) * np.exp(.5j * np.interp(bins_hz, hz, lead_rad))
    return irfft(rfft(x, size) * np.array([half, 1 / half]), size)[:, :N]


def record(dry):
    """Microphone pair, placed anew for the wet pass; soft clip, then low-pass."""
    ceiling, top_hz = 1.1, 15750
    placed = np.where(T < WET_S, stereo_split(dry, STEREO_DRY), stereo_split(dry, STEREO_WET))
    rounded = ceiling * np.tanh(equalise(placed, MIC_EQ) / ceiling)
    return signal.sosfilt(signal.ellip(8, .2, 70, top_hz, fs=SR, output="sos"), rounded)


dry = scene()
out = record(dry)
master(out)
```